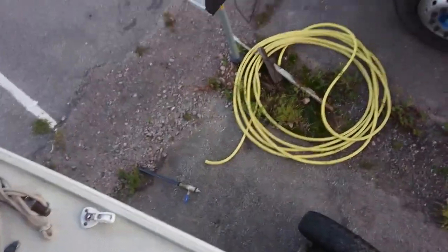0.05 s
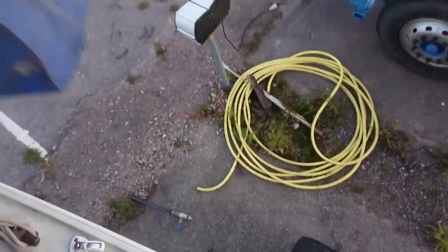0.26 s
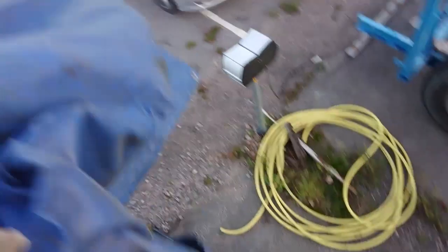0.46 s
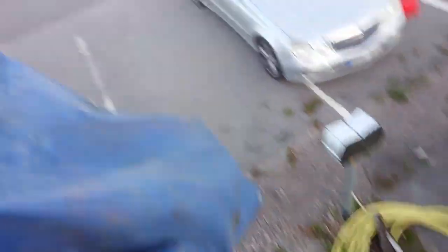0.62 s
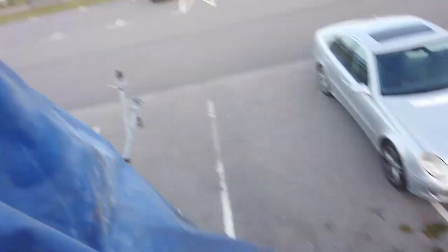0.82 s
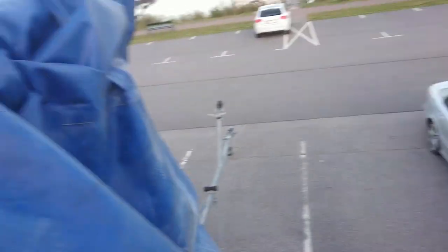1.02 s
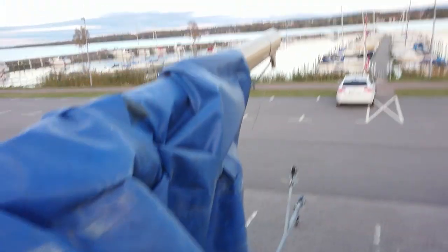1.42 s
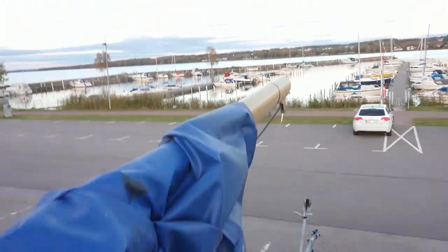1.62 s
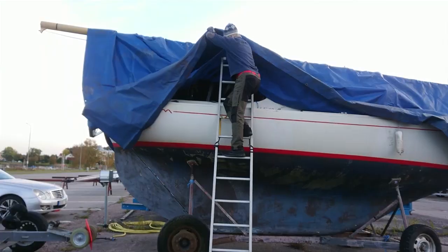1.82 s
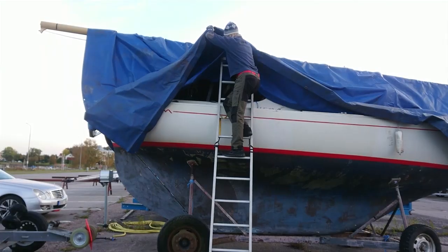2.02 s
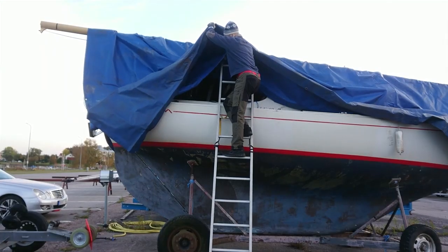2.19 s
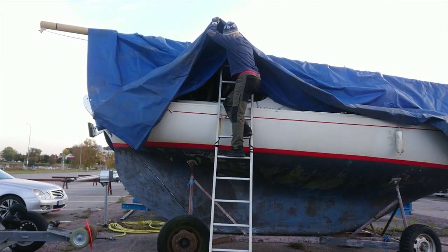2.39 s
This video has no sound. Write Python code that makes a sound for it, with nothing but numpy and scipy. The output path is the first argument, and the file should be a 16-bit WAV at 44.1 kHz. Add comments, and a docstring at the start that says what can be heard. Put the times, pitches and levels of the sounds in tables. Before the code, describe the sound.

A heavy tarpaulin brushes close past the microphone outdoors, hissing, flapping and snapping at its creases. It settles to a faint rustle, and short wind gusts thump the microphone over a low rumble and faint distant traffic.

```python
"""A heavy tarpaulin brushes past the microphone in a boatyard. The coated cloth hisses as it slides on
itself, knocks and flaps as its folds buckle, snaps at the creases and rasps where it is pulled taut.
It settles to a faint rustle while gusts buffet the two microphone ports, mostly the right.
Underneath lie a wind rumble and a low outdoor hush, joined late by distant traffic, a falling swish
and one thin click."""
import sys
import numpy as np
from scipy import signal
from scipy.fft import rfft, irfft, next_fast_len
from scipy.io import wavfile
from scipy.ndimage import uniform_filter1d, map_coordinates

SR = 44100
rng = np.random.default_rng(int(sys.argv[2]) if len(sys.argv) > 2 else 0)


def dump_mix(stems):
    """Bounce the given channels to the path in sys.argv[1] as a 16-bit WAV at rate SR."""
    frames = np.atleast_2d(stems).T  # one column per channel
    limited = np.clip(frames, -1, 1)  # hard clip at full scale
    pcm = np.round(limited * 32767).astype(np.int16)
    wavfile.write(sys.argv[1], SR, pcm)


N = 112454

# Fader rides. Pan is always left minus right.
# cloth sliding on itself: t/s, relative level/dB, pan/dB
SLIDE_RIDE = [(0, -66, -1), (.06, -77.5, 11.5), (.17, -67, 5), (.235, -77, 15), (.28, -64, 7.5),
              (.35, -58, 9.5), (.40, -55.5, 8.5), (.46, -55, 6.5), (.51, -60.5, 2.5), (.61, -65.5, 6.5),
              (.66, -75, 4), (.74, -67, 8.5), (.86, -78.5, 3), (1.11, -76, 7), (1.17, -81.5, 3.5),
              (1.29, -78, 5), (1.35, -73, 8.5), (1.43, -82, 3.5), (2.55, -91.5, 13)]
# folds buckling: t/s, level/dB
FOLD_RIDE = [(0, -51.5), (.11, -59.5), (.22, -48.5), (.3, -49), (.38, -38.5), (.46, -39), (.52, -49.5),
             (.58, -44), (.65, -48), (.74, -46), (.83, -52.5), (.9, -61), (1.1, -55.5), (1.17, -74),
             (1.34, -59), (1.45, -64), (1.75, -85), (1.82, -62), (1.95, -64.5), (2.55, -66.5)]
# small creases crackling: t/s, level/dB, pan/dB
CRACKLE_RIDE = [(0, -69.5, -6), (.27, -62, -4.5), (.44, -49.5, -2), (.52, -56.5, 3), (.6, -53, -6.5),
                (.7, -58, -3), (.76, -61, -11.5), (.87, -63.5, -0.5), (1.0, -61, -2), (1.11, -63.5, -7.5),
                (1.17, -68, 1), (1.28, -69.5, 0), (1.35, -68, 6), (1.44, -69.5, 3), (2.0, -82.5, 2.5)]
# wind rumble: t/s, level/dB
RUMBLE_RIDE = [(0, -55), (.3, -53), (.6, -56.5), (.9, -53), (1.05, -61.5), (1.18, -61), (1.35, -55),
               (1.45, -60.5), (1.8, -55.5), (2.05, -64.5), (2.3, -55), (2.55, -53)]
# distant traffic: t/s, level/dB
TRAFFIC_RIDE = [(1.5, -92), (1.85, -76.5), (2.15, -76.5), (2.3, -68), (2.44, -65), (2.55, -71.5)]
# where the cloth is: t/s, lead of the left port/ms
LEFT_LEAD = [(0, 0.39), (.41, 0.26), (.46, 0.28), (.58, 0.17), (.69, 0.033), (.9, 0.29), (1.3, .4)]

# creases snapping: t/s, level before EQ/dB, f/Hz, pan/dB
SNAP_CUES = [(0.069, -42, 810, 4), (.143, -40.5, 694, 6), (.4531, -11.5, 1740, -3), (.461, -32.5, 1370, 1),
             (.584, -27.5, 1280, -5.5), (.602, -32.5, 2150, -5), (.618, -36, 1620, -13),
             (0.6866, -31.5, 970, -9), (.7338, -32, 1200, -10), (.839, -41, 700, -3),
             (1.044, -42.5, 1310, -2), (1.313, -48, 2500, 1), (1.335, -47, 3600, 1), (1.359, -43, 1900, -8),
             (1.505, -52.5, 776, -8), (1.529, -48, 2040, 7)]
# folds flapping over: t/s, level/dB, starting f/Hz, t60/s
FLAP_CUES = [(0.07, -45.5, 340, 0.031), (0.1415, -37.5, 227, 0.053), (0.182, -34, 162, 0.023),
             (0.219, -26, 122, 0.059), (.221, -37.5, 332, 0.075), (0.249, -37.5, 113, 0.076),
             (.377, -26, 203, 0.021), (0.383, -31, 483, 0.025), (0.408, -25.5, 609, 0.046),
             (0.445, -30.5, 548, 0.066), (0.4538, -19, 138, 0.063), (0.498, -35.5, 530, 0.038),
             (.554, -33.5, 249, 0.028), (0.669, -34.5, 209, 0.046), (0.6869, -25, 312, 0.05),
             (0.726, -28.5, 277.3, 0.1), (0.751, -29.5, 106, 0.027), (0.763, -36, 292, 0.028),
             (.794, -34, 276, 0.052), (0.84, -45.5, 367, 0.042), (1.075, -40, 196, 0.021),
             (1.239, -43.5, 250, 0.021), (1.799, -42.5, 193, 0.052), (2.486, -50.5, 580, 0.047)]
# coating crinkling: t/s, level/dB, pan/dB
CRINKLE_CUES = [(0.262, -58, 13), (0.383, -62, -7), (0.601, -57, -4), (0.83, -68, 7), (1.089, -65, 6),
                (1.124, -65, 8)]
# taut weave rasping: peak t/s, Gaussian width/s, level/dB, f/Hz, relative octave level/dB
RASP_CUES = [(0.344, 0.02, -49, 1716, -10), (0.463, 0.0074, -47.5, 1877, -12),
             (1.347, 0.015, -69, 2233, -5.5), (2.368, 0.0036, -66.5, 2560, -26)]
# gusts on the ports: peak t/s, Gaussian width/s, level/dB, pan/dB
GUST_CUES = [(1.298, 0.035, -62, -20), (1.507, 0.012, -47.5, -10.5), (1.57, 0.013, -51, 12),
             (1.651, 0.019, -46.5, -20.5), (1.71, 0.018, -45.5, -19.5), (2.178, 0.0083, -52, -26),
             (2.234, 0.015, -45, -28), (2.353, 0.017, -50, -19.5), (2.503, 0.07, -54, 10)]
# eddies hitting the right port: t/s, level/dB
THUMP_CUES = [(1.736, -30), (2.106, -32.5), (2.233, -25), (2.277, -28)]

# tone colour of each source: f/Hz, level/dB
SLIDE_EQ = [(200, -20), (700, -0.5), (1200, -23), (1650, -1.5), (2200, -7), (3000, -12), (3600, -10.5),
            (5000, -20.5), (7000, -22), (10000, -19), (12500, -24), (16000, -28.5)]
FOLD_EQ = [(30, -28.5), (55, 1.5), (140, -2), (280, 0.5), (450, -12.5), (600, -9), (780, -11.5),
           (1300, -39), (2500, -37.5), (6000, -54)]
CREASE_EQ = [(200, -10.5), (600, 1), (1100, 2.5), (1900, -3.5), (3000, -11.5), (6000, -24.5),
             (12000, -70.5)]
RUMBLE_EQ = [(25, -30), (55, 4.5), (90, 4.5), (140, -4.5), (250, -17), (500, -18), (1500, -66.5)]
HUSH_EQ = [(60, -6), (250, -0.5), (500, 3), (1000, -2), (1600, -6), (2500, -10), (4000, -16), (5500, -21.5),
           (7000, -13.5), (10000, -35.5), (13000, -29.5)]
SNAP_EQ = [(100, -15), (500, 9.5), (3000, -1.5), (4500, -25), (7000, -21)]
CRINKLE_EQ = [(500, -19), (2000, -1), (4000, 4.5), (7000, -7.5), (10000, -1.5), (12500, -22),
              (15000, -37.5)]
GUST_EQ = [(25, -31), (45, -3), (65, 3.5), (100, 1.5), (150, -10), (250, -31), (500, -56), (1500, -83)]
TRAFFIC_EQ = [(300, -16), (800, 1.5), (1400, 1), (2000, -6), (3000, -12.5), (6000, -31.5)]
# the microphone's wind filter and port resonance: f/Hz, level/dB
PORT_EQ = [(20, -39), (35, -14.5), (52, 1), (5000, -1.5), (6200, -8.5), (7100, -16), (8400, -2),
           (9700, 10.5), (11000, 3.5), (12500, -7), (15000, -14.5)]


def amp(db):
    """Decibels to gain."""
    return 10 ** (np.asarray(db) / 20)


def unit(x):
    """Scale to rms 1."""
    return x / np.sqrt(np.mean(x ** 2) + 1e-20)


def curves(rows):
    """One value per sample for each column after the time."""
    times, *columns = np.transpose(rows)
    return [np.interp(np.arange(N) / SR, times, column) for column in columns]


def pan(db):
    """Left and right gains for a level difference."""
    return amp(np.array([[.5], [-.5]]) * db)


def swell(peak_s, width_s):
    """A Gaussian fade in and out."""
    return np.exp(-.5 * ((np.arange(N) / SR - peak_s) / width_s) ** 2)


def wobble(rate):
    """A smooth random curve, rate knots a second."""
    return map_coordinates(rng.standard_normal(N // 8), [np.arange(N) * rate / SR], mode="wrap")


def equalise(x, eq):
    """Minimum-phase EQ through (f/Hz, level/dB) points."""
    size = 2 * next_fast_len(N)
    hz, db = np.transpose(eq)
    gain_db = np.interp(np.log(np.fft.rfftfreq(size, 1 / SR) + 1), np.log(hz), db)
    cepstrum = irfft(np.log(amp(gain_db)))
    cepstrum[1:size // 2] *= 2
    cepstrum[size // 2 + 1:] = 0
    return irfft(rfft(x, size) * np.exp(rfft(cepstrum)), size)[..., :N]


def stereo(three, alike):
    """Mix one shared signal with one of each port's own."""
    return np.sqrt(alike) * three[0] + np.sqrt(1 - alike) * three[1:]


def noise(eq, alike):
    """Smooth stereo noise of rms 1."""
    return unit(equalise(stereo(rng.standard_normal((3, N)), alike), eq))


def grains(eq, rate, spread_db, bed_db, alike):
    """Tiny slips of uneven size, rate a second, on a bed of friction noise; rms 1."""
    sizes = amp(spread_db * np.clip(rng.standard_normal((3, N)), -2, 2))
    signs = rng.choice([-1, 1], (3, N))
    slips = unit(sizes * signs * (rng.random((3, N)) < rate / SR))
    bed = amp(bed_db) * rng.standard_normal((3, N))
    return unit(equalise(stereo(slips + bed, alike), eq))


def band(phase, width_hz):
    """A fuzzy line of noise around a running phase, unrelated at the two ports."""
    fuzz = np.array([wobble(width_hz) + 1j * wobble(width_hz) for _ in range(2)])
    return (fuzz * np.exp(1j * phase)).real


def add(track, start_s, sound):
    """Drop a sound onto a track at its cue."""
    part = track[..., round(start_s * SR):][..., :sound.shape[-1]]
    part += sound[..., :part.shape[-1]]


def placed(pair):
    """The cloth's sound reaches the left port a little earlier."""
    lead_ms, = curves(LEFT_LEAD)
    half_lead = lead_ms * SR / 2000
    return np.array([map_coordinates(channel, [np.arange(N) + shift], order=5)
                     for channel, shift in zip(pair, (half_lead, -half_lead))])


def slide():
    """Coated cloth rubs on itself with a fine, catching hiss."""
    level_db, pan_db = curves(SLIDE_RIDE)
    hiss = grains(SLIDE_EQ, rate=900, spread_db=5, bed_db=-2, alike=0.09)
    trim_db, flutter_db = 3, 1.5 * wobble(69.5)
    return amp(level_db + trim_db + flutter_db) * pan(pan_db) * hiss


def crumple():
    """Buckling folds give dull knocks, small creases a drier crackle."""
    fold_db, = curves(FOLD_RIDE)
    crackle_db, pan_db = curves(CRACKLE_RIDE)
    knocks = grains(FOLD_EQ, rate=300, spread_db=0.5, bed_db=-6, alike=0.99)
    crackle = grains(CREASE_EQ, rate=350, spread_db=2.5, bed_db=-6, alike=0.24)
    flutter_db = 1.5 * wobble(40.8)
    return amp(fold_db) * knocks + amp(crackle_db + flutter_db) * pan(pan_db) * crackle


def rumble():
    """Wind lays a wavering low end under everything."""
    level_db, = curves(RUMBLE_RIDE)
    flutter_db = 1.5 * wobble(9.23)
    return amp(level_db + flutter_db) * noise(RUMBLE_EQ, alike=0.53)


def hush():
    """Moving air makes a soft, wide bed."""
    return amp(-69.5) * noise(HUSH_EQ, alike=0.1)


def snaps():
    """A stiff crease gives way with a sharp tick and a short spray of crackle."""
    ring_cycles, spray_db, spray_t60_s = 3.3, -24, .035
    out, t = np.zeros((2, N)), np.arange(SR // 20) / SR
    crackle = noise(CREASE_EQ, alike=0.85)
    for start_s, db, hz, pan_db in SNAP_CUES:
        tick = amp(-60 * t * hz / ring_cycles) * np.sin(2 * np.pi * hz * t)
        grit = np.roll(crackle, -round(start_s * SR), axis=1)[:, :len(t)]
        spray = amp(spray_db - 60 * t / spray_t60_s) * grit
        add(out, start_s, amp(db) * pan(pan_db) * (spray - tick))
    return equalise(out, SNAP_EQ)


def flaps():
    """A fold pops over with a puff of air and swings for a few cycles, slackening as it goes."""
    attack_s, puff_db, puff_band_hz = 0.00035, -15, [147, 588]
    sag, roughness = 0.092, .1  # fractions of the pitch
    out, t = np.zeros(N), np.arange(SR // 8) / SR
    puff_filter = signal.butter(3, puff_band_hz, "band", fs=SR, output="sos")
    air = unit(signal.sosfilt(puff_filter, rng.standard_normal(N)))
    for start_s, db, hz, t60 in FLAP_CUES:
        pitch = hz * (1 - sag * np.minimum(t / t60, 1) + roughness * wobble(2 * hz)[:len(t)])
        swing = np.sin(2 * np.pi * np.cumsum(pitch) / SR)
        puff = amp(puff_db) * np.roll(air, -round(start_s * SR))[:len(t)]
        envelope = amp(-60 * t / t60) * (1 - np.exp(-t / attack_s))
        add(out, start_s, amp(db) * envelope / envelope.max() * (swing + puff))
    return out


def crinkles():
    """The coating crackles in brief bright flecks."""
    t60_s = 0.017
    envelope, t = np.zeros((2, N)), np.arange(SR // 20) / SR
    for start_s, db, pan_db in CRINKLE_CUES:
        add(envelope, start_s, pan(pan_db) * amp(db - 60 * t / t60_s))
    return envelope * grains(CRINKLE_EQ, rate=6300, spread_db=4.5, bed_db=-21, alike=0.1)


def rasps():
    """Pulled taut, the weave zips with a rough pitch and its octave."""
    out, t = np.zeros((2, N)), np.arange(N) / SR
    for peak_s, width_s, db, hz, octave_db in RASP_CUES:
        phase = 2 * np.pi * hz * t
        weave = band(phase, width_hz=400) + amp(octave_db) * band(2 * phase, width_hz=800)
        out += amp(db) * swell(peak_s, width_s) * weave
    return pan(db=0.5) * out


def gusts():
    """Gusts shake each port separately in short, bassy bursts."""
    power = sum((amp(db) * pan(pan_db) * swell(peak_s, width_s)) ** 2
                for peak_s, width_s, db, pan_db in GUST_CUES)
    eddies = noise(GUST_EQ, alike=0)
    # even out the noise so that the cues shape each burst
    eddy_power = np.abs(uniform_filter1d(np.abs(signal.hilbert(eddies)) ** 2, size=700)) / 2
    return np.sqrt(power) * eddies / np.sqrt(eddy_power + 0.037)


def traffic():
    """Far-off traffic swells as a midrange wash."""
    level_db, = curves(TRAFFIC_RIDE)
    return amp(level_db) * noise(TRAFFIC_EQ, alike=0.7)


def thumps():
    """An eddy breaks on the right port: a sharp shove that sags into a slow swing."""
    start_hz, end_hz, sag_s, rise_s = 261, 64.4, 0.0039, 0.0082
    out, t = np.zeros((2, N)), np.arange(SR // 10) / SR
    pitch = end_hz + (start_hz - end_hz) * np.exp(-t / sag_s)
    envelope = t / rise_s * np.exp(1 - t / rise_s)
    shove = envelope * np.sin(2 * np.pi * np.cumsum(pitch) / SR)
    for start_s, db in THUMP_CUES:
        add(out[1], start_s, amp(db) * shove)
    return out


def swish():
    """A faint, airy swish falls in pitch far away."""
    start_s, length_s, start_hz, fall_hz_per_s = 1.815, .45, 1860, 800
    t = np.clip(np.arange(N) / SR - start_s, 0, length_s)
    phase = 2 * np.pi * (start_hz * t - fall_hz_per_s * t ** 2 / 2)
    arch = np.sqrt(np.abs(np.sin(np.pi * t / length_s)))
    return amp(-73.5) * arch * band(phase, width_hz=480)


def click():
    """A thin, dry click at the microphone, with no ring, alike at both ports."""
    start_s, level_db, t60_s = 1.826, -52.5, .0006
    out, t = np.zeros(N), np.arange(SR // 20) / SR
    add(out, start_s, amp(level_db - 60 * t / t60_s))
    return out


def scene():
    """The tarpaulin up close, wind on the ports and the distance behind."""
    tarpaulin = placed(slide() + rasps() + crumple() + flaps() + snaps() + crinkles())
    wind = gusts() + rumble() + thumps()
    return tarpaulin + wind + click() + hush() + traffic() + swish()


def record(dry):
    """The wind filter trims the sub-bass, the ports colour the treble, a hard cut takes off the top."""
    size, top_hz = 2 * next_fast_len(N), 15700
    passband = np.fft.rfftfreq(size, 1 / SR) < top_hz
    return irfft(rfft(equalise(dry, PORT_EQ), size) * passband, size)[:, :N]


dry = scene()
out = record(dry)
dump_mix(out)
```